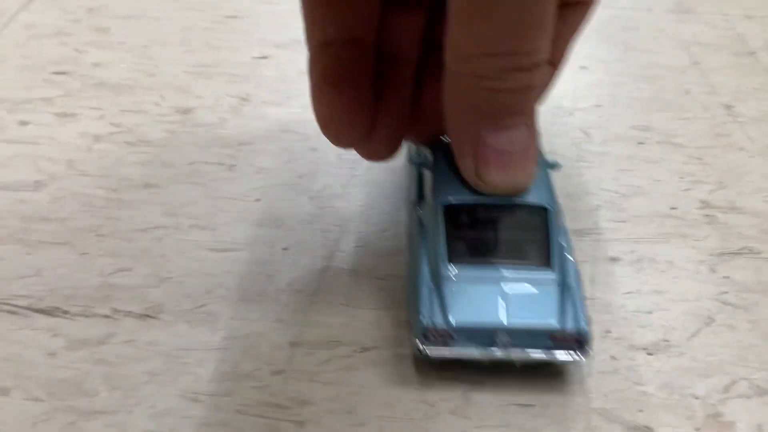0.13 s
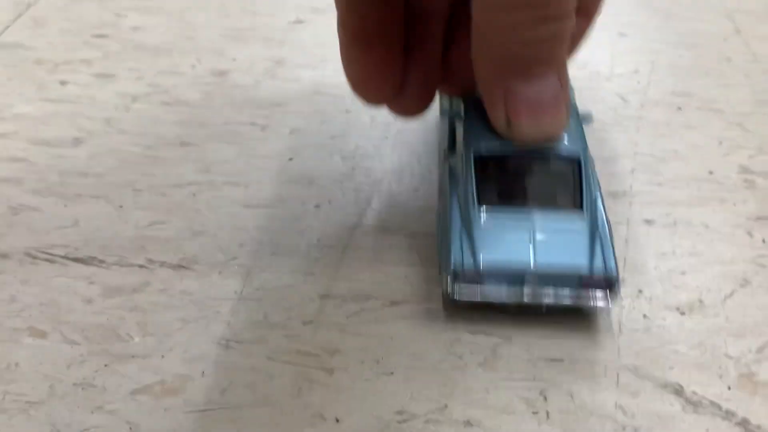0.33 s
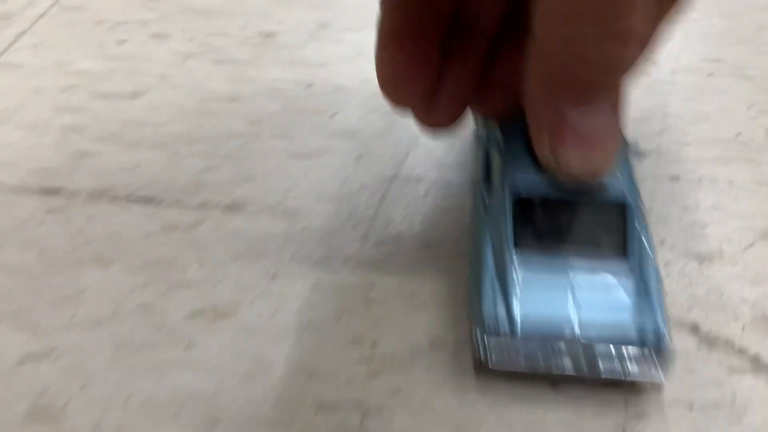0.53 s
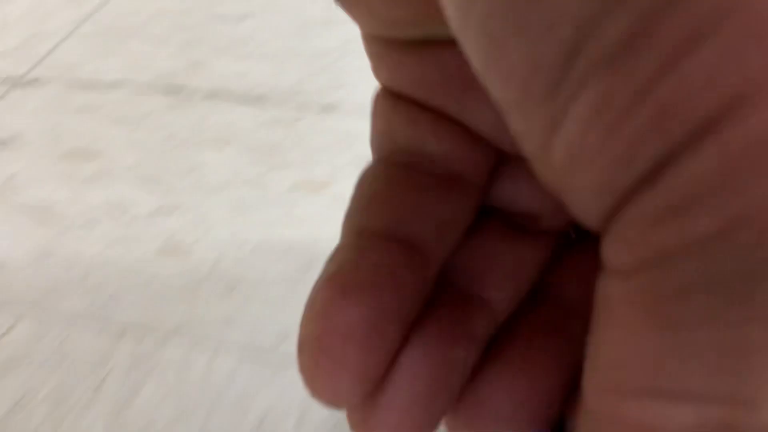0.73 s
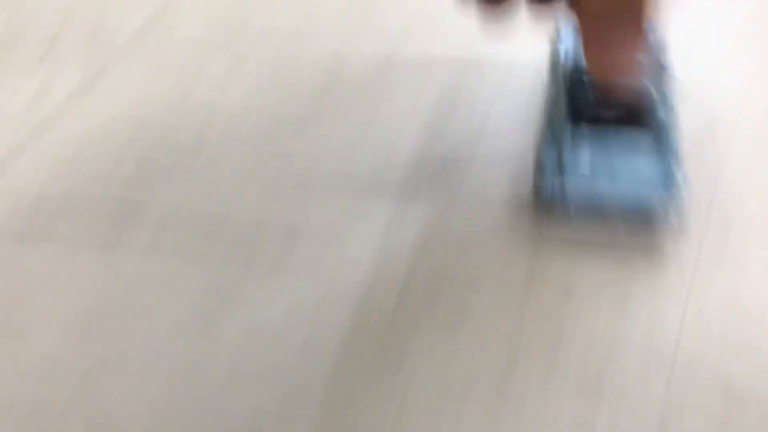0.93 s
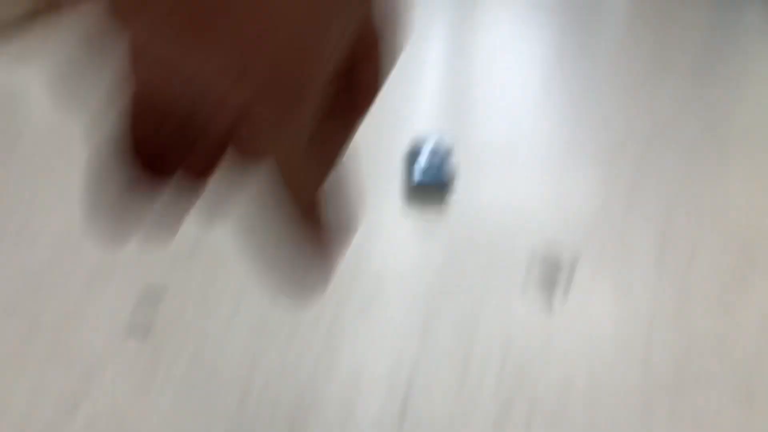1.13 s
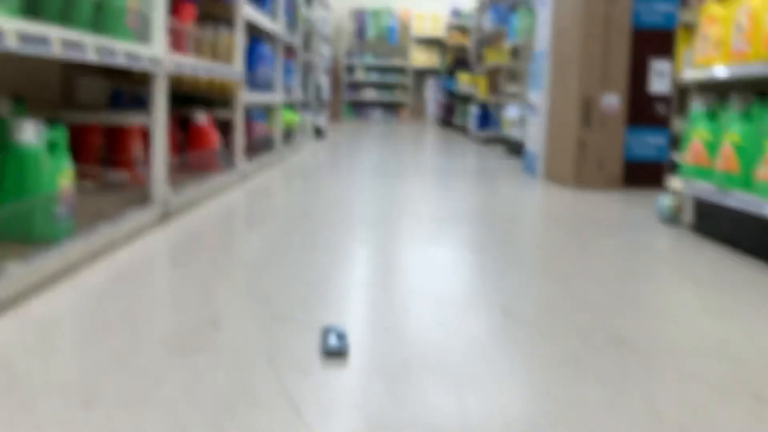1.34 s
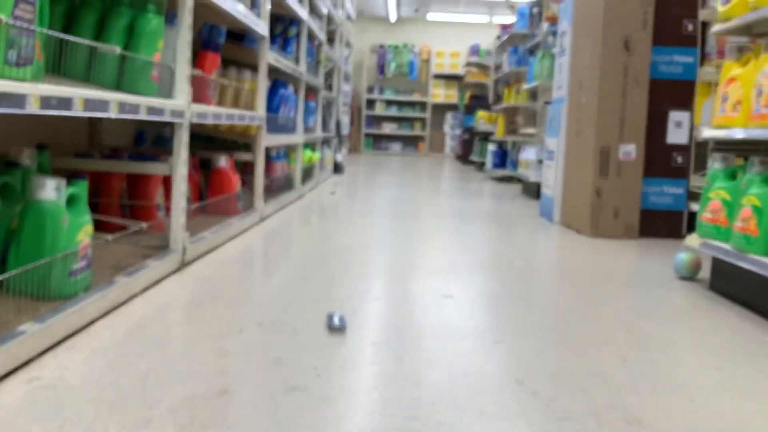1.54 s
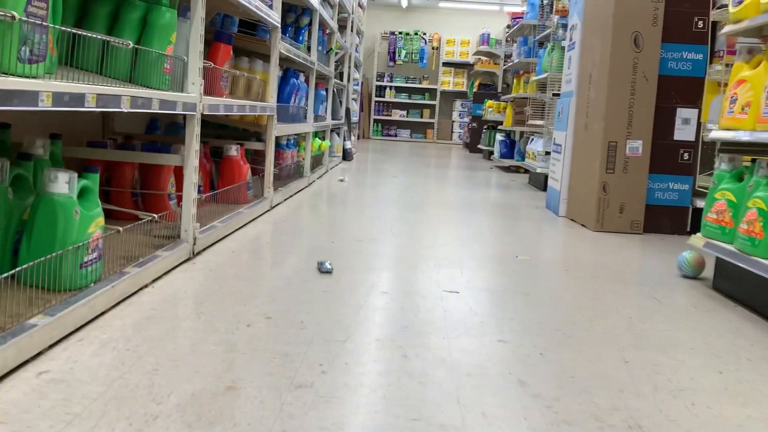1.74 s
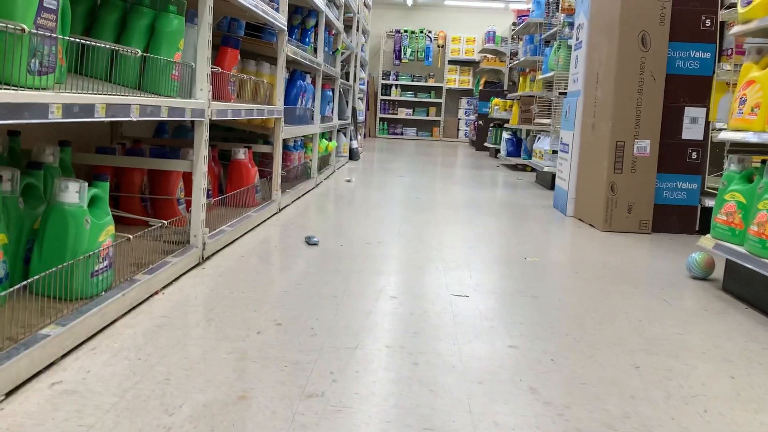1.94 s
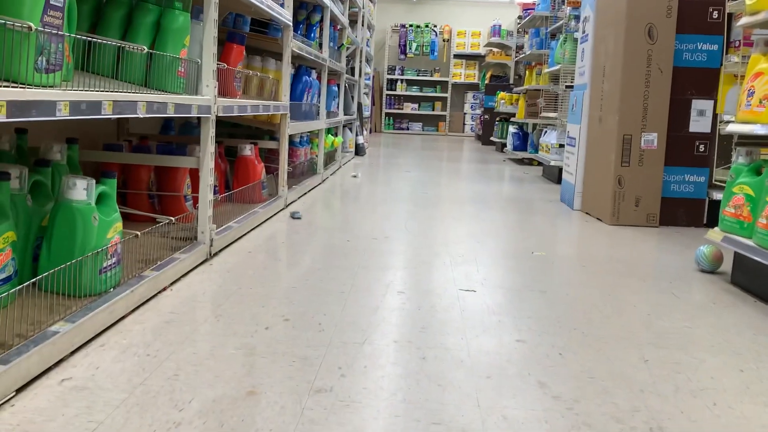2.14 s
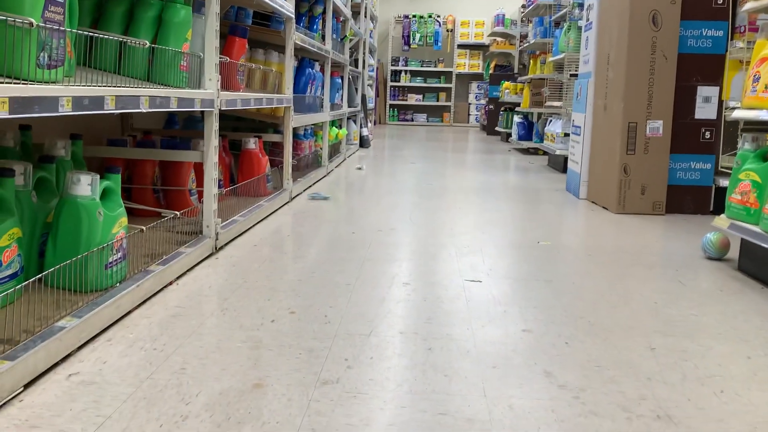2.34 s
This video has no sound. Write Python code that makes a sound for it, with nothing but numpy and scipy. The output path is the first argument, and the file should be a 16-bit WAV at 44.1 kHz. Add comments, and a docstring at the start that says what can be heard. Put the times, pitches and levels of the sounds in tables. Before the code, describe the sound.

A small metal toy car scrapes softly on a hard floor, is shoved off with a clatter and rolls away with a gritty rush until it clacks against a shelf. A low ventilation hum fills the shop aisle.

```python
"""Toy car in a shop aisle

A small die-cast car is rolled back by hand, shoved off and rolls away until it hits a shelf foot.
Hard wheels chatter over the floor's grit and ring the metal body; the crash echoes in the aisle.
Ventilation and mains hum fill the shop. A phone's two microphones hear it with a phase offset."""
import sys
import numpy as np
from scipy import signal
from scipy.fft import rfft, irfft, next_fast_len
from scipy.io import wavfile
from scipy.ndimage import map_coordinates

SR = 44100
rng = np.random.default_rng(int(sys.argv[2]) if len(sys.argv) > 2 else 0)


def log_audio(samples):
    """Write samples as a 16-bit WAV file to the path given in sys.argv[1]."""
    # one column per channel
    frames = np.atleast_2d(samples).T
    # limit to full scale, then quantise
    limited = np.clip(frames, -1, 1)
    pcm = np.round(limited * 32767).astype(np.int16)
    wavfile.write(sys.argv[1], SR, pcm)


N = 105002

# Background spectra (frequency [Hz], relative level [dB])
VENT_SPECTRUM = [(13, -48), (22, -19), (65, 0.5), (91, 0), (125, 2), (148, -8.5), (245, -17), (388, -22),
                 (530, -29.5), (708, -29), (1070, -41.5), (1230, -36), (7000, -58.5), (9100, -98),
                 (15400, -120)]
ROOM_HISS_SPECTRUM = [(2000, -20), (5000, 4), (8000, -12), (15500, -22)]
# Rolling force (time [s], level [dB], hiss re level [dB], rumble re level [dB])
ROLL_LEVELS = [(0, -62.5, -19, -6), (0.2, -60.5, -12, -3), (0.26, -66, -17, -17), (0.3, -61.5, -21, -18),
               (0.35, -54, -15, -14), (0.44, -70.5, -22, -7), (0.529, -42.5, -13, -8),
               (0.598, -37, -8, -11), (0.68, -34.5, -17, -9), (0.744, -37.5, -22, -8.5),
               (0.786, -60.5, -22, -3), (0.815, -53, -15, -4), (0.869, -31.5, -12, -23),
               (0.899, -23, -9.5, -15), (0.946, -20, -5, -31), (0.963, -31, 2.5, -9.5),
               (1.05, -32, -2.5, -14), (1.2, -33.5, -4.5, -18.5), (1.4, -36, -4, -14.5),
               (1.64, -40, -7, -26), (1.82, -37, -5, -9), (1.9, -38.5, -7.5, -31), (2.15, -42, -5, -35),
               (2.23, -36.5, -6, -17), (2.33, -41, -10.5, -5), (2.38, -42, -11, -20)]
# Wheel and body knocks; shelf contacts (time [s], body [dB], treble [dB], rumble [dB])
KNOCKS = [(0.085, -60, -75, -46.5), (0.1915, -51, -76, -54), (0.3247, -43, -65, -39),
          (0.5142, -36, -61, -35), (0.5692, -26, -25, -60), (0.8005, -57, -72, -38.5),
          (0.826, -27.5, -49, -43), (0.8382, -21.5, -37, -23.5), (0.8619, -18, -48, -62),
          (0.8999, -10, -33, -41), (0.9274, -7, -28, -39), (0.9444, -7.5, -32, -51),
          (1.2665, -18, -16.5, -52), (2.3599, -44, -27.5, -50)]
SHELF_CONTACTS = [(2.2355, -38, -31, -54), (2.2384, -12, -9, -29.5), (2.2475, -13.5, -9.5, -41),
                  (2.2515, -12.5, -30, -27.5), (2.259, -13, -24, -28.5)]
# Car's force-to-sound paths (frequency [Hz], relative gain [dB])
SCRAPE_PATH = [(500, -30), (1200, -11), (1600, -3), (2000, -1), (2500, -3), (3000, 0), (4300, -1),
               (4900, -10), (7000, -20), (9000, -35)]
HISS_PATH = [(3500, -25), (4800, -1), (7000, -1), (10000, -5), (13000, -9), (14000, -14), (15000, -7),
             (15700, -7)]
SNAP_PATH = [(3500, -42), (5500, 5.5), (7500, 4.5), (12000, -2.5), (14000, -5.5), (15500, -9), (16600, -17)]
RUMBLE_PATH = [(200, -27.5), (450, -8), (750, -7.5), (950, -6.5), (1300, 0), (2000, -3.5)]
# Metal body resonances (frequency [Hz], width [Hz], relative gain [dB])
BODY_MODES = [(930, 120, -16), (1270, 130, -13), (1590, 100, -6), (1850, 95, 0), (2130, 110, 0),
              (2330, 100, -4), (2630, 140, -4), (3030, 140, -2), (3270, 130, -2), (3660, 120, 0),
              (3880, 110, -2), (4200, 110, 0), (5050, 150, -10), (6600, 700, -17)]
# Change per resonance under a fingertip (gain [dB])
HELD_MODE_DB = [10, 3, 3, 5, 3, 4, -6, -4, 0, -4, -2, -3, -2, 0]
# Microphone phase (frequency [Hz], left lead [rad])
MIC_LEAD = [(0, 0), (1400, 2), (2400, 8), (3200, 8), (5000, 8.5), (6300, 12), (15700, 0.5), (22050, -18)]
# Microphone likeness (frequency [Hz], coherence [0-1])
MIC_COHERENCE = [(60, 0.99), (200, 0.97), (500, 0.69), (1200, 0.087), (4000, 0.11), (6500, 0.54), (8000, 1),
                 (16000, 1)]
# Microphone balance (frequency [Hz], left minus right [dB])
MIC_BALANCE = [(60, -4), (130, -1.5), (290, -3), (640, 0.5), (1410, 2), (3100, -1.5), (6820, -2),
               (15000, 2)]

KNOCK_T60_S, CRASH_T60_S = (.012, .008, .014), (.043, .014, .043)  # body, treble, rumble
LET_GO_S, RELEASE_S = 0.98, 0.03
HELD_STEADYING, HELD_SCRAPE_DB = 0.4, -4
DRIFT_DB, DRIFT_PER_S = 4, 22
WANDER_HZ, WANDER_PER_S = 70, 14


def amp(db):
    return 10 ** (np.asarray(db) / 20)


def unit_rms(x):
    return x / np.sqrt(np.mean(x ** 2) + 1e-20)


def log_interp(points, hz):
    knots_hz, values = np.transpose(points)
    return np.interp(np.log(hz + 1), np.log(knots_hz + 1), values)


def wobble(knots_per_s, count=N):
    """Smooth random curve."""
    knots = rng.standard_normal(int(count * knots_per_s / SR) + 4)
    return map_coordinates(knots, [np.arange(count) * knots_per_s / SR])


def filtered(x, response):
    size = 2 * next_fast_len(N // 2 + SR // 4)
    return irfft(rfft(x, size) * response(np.fft.rfftfreq(size, 1 / SR)), size)[..., :N]


def colour(points):
    """Minimum-phase response through the points, closed outside them."""
    closed = [(1, -129), *points, (points[-1][0] + 300, -120)]

    def response(hz):
        cepstrum = irfft(np.log(amp(log_interp(closed, hz))))
        half = len(cepstrum) // 2
        cepstrum[1:half] *= 2
        cepstrum[half + 1:] = 0
        return np.exp(rfft(cepstrum))
    return response


def shop(vent_db=-36.5, hiss_db=-70.5, hum_db=-39, hum_hz=119.5, waver_db=2.5):
    """Ventilation rumble, faint hiss and wavering mains hum."""
    vent = unit_rms(filtered(rng.standard_normal(N), colour(VENT_SPECTRUM)))
    hiss = unit_rms(filtered(rng.standard_normal(N), colour(ROOM_HISS_SPECTRUM)))
    hum = np.sqrt(2) * np.sin(2 * np.pi * hum_hz * np.arange(N) / SR + 1.19 * wobble(5.65))
    return amp(vent_db) * vent + amp(hiss_db) * hiss + amp(hum_db + waver_db * wobble(4.2)) * hum


def grit(bumps_per_s=1400, spread_db=2, bump_share=0.46):
    """Random floor bumps over fine roughness."""
    struck = rng.random(N) < bumps_per_s / SR
    bumps = struck * amp(spread_db * rng.standard_normal(N)) * rng.standard_normal(N)
    return np.sqrt(bump_share) * unit_rms(bumps) + np.sqrt(1 - bump_share) * rng.standard_normal(N)


def rolling(flutter_db=1.3, flutter_per_s=70):
    """Fluttering force of wheels on grit: body, treble, rumble."""
    times_s, *columns = np.transpose(ROLL_LEVELS)
    level_db, hiss_db, rumble_db = [np.interp(np.arange(N) / SR, times_s, c) for c in columns]
    level_db += flutter_db * wobble(flutter_per_s)
    return np.array([grit() * amp(level_db + offset_db) for offset_db in (0, hiss_db, rumble_db)])


def jolts(contacts, t60_s, rise_s=.0003):
    """One dying burst of noisy force per contact: body, treble, rumble."""
    force = np.zeros((3, N + SR))
    t = np.arange(SR // 4) / SR
    envelope = amp(-60 * t / np.array(t60_s)[:, None]) * (1 - np.exp(-t / rise_s))
    for time_s, *levels_db in contacts:
        start = round(time_s * SR)
        signs = np.sign(rng.standard_normal(len(t)))
        force[:, start:start + len(t)] += amp(levels_db)[:, None] * envelope * signs
    return force[:, :N]


def crash(aisle_db=(-7, -2, 1), aisle_t60_s=0.18):
    """Quick shelf contacts plus the aisle's reverberation: body, treble, rumble."""
    hit = jolts(SHELF_CONTACTS, CRASH_T60_S)
    t = np.arange(SR // 2) / SR
    tail = rng.standard_normal(len(t)) * amp(-60 * t / aisle_t60_s)
    reverb = signal.fftconvolve(hit, tail[None] / np.linalg.norm(tail), axes=1)[:, :N]
    return hit + amp(aisle_db)[:, None] * reverb


def car_paths(hz, ring_db=8):
    """Hiss, snap and rumble at unit power each; scrape and body modes share unit power."""
    hiss, snap, rumble, scrape = [colour(p)(hz) for p in (HISS_PATH, SNAP_PATH, RUMBLE_PATH, SCRAPE_PATH)]
    body = [scrape]
    for mode_hz, width_hz, gain_db in BODY_MODES:
        loss = 1j * hz * width_hz
        body.append(amp(gain_db + ring_db) * (loss / (mode_hz ** 2 - hz ** 2 + loss)) ** 2)
    paths = []
    for group in ([hiss], [snap], [rumble], body):
        power = sum(np.mean(np.abs(path) ** 2) for path in group)
        paths += [path / np.sqrt(power) for path in group]
    return np.array(paths)


def rocking(knots_per_s, held, hop=16):
    """The car's rocking, one curve per mode; smaller while held."""
    coarse = [wobble(hop * knots_per_s, N // hop + 1) for _ in BODY_MODES]
    return (1 - HELD_STEADYING * held) * np.repeat(coarse, hop, axis=1)[:, :N]


def body_ring(modes, held):
    """Rocking shifts each mode's strength and pitch; the fingertip rebalances the modes."""
    drift = unit_rms(amp(DRIFT_DB * rocking(DRIFT_PER_S, held)))
    wander_cycles = np.cumsum(WANDER_HZ * rocking(WANDER_PER_S, held), axis=1) / SR
    analytic = signal.hilbert(modes, next_fast_len(N))[:, :N]
    rings = np.real(analytic * np.exp(2j * np.pi * wander_cycles))
    return (rings * drift * amp(np.outer(HELD_MODE_DB, held))).sum(axis=0)


def car():
    """Rolling and impacts drive the car's paths; a fingertip rests on the roof until let-go."""
    roll_body, roll_treble, roll_rumble = rolling()
    hit_body, hit_treble, hit_rumble = jolts(KNOCKS, KNOCK_T60_S) + crash()
    body_forces = [roll_body + hit_body] * (1 + len(BODY_MODES))
    forces = np.array([roll_treble, hit_treble, roll_rumble + hit_rumble] + body_forces)
    forces *= np.sign(rng.standard_normal(forces.shape))  # decorrelates the paths
    hiss, snap, rumble, scrape, *modes = filtered(forces, car_paths)
    held = np.clip((LET_GO_S - np.arange(N) / SR) / RELEASE_S, 0, 1)
    return hiss + snap + rumble + amp(HELD_SCRAPE_DB * held) * scrape + body_ring(modes, held)


def microphones(shared, scattered):
    """Shared sound in like sign, scattered in opposite sign; both offset in phase and level."""
    side = np.array([[1], [-1]])

    def mix_rad(hz):
        return np.arccos(log_interp(MIC_COHERENCE, hz)) / 2

    def port(hz):
        lead_rad = np.interp(hz, *np.transpose(MIC_LEAD))
        return amp(side * log_interp(MIC_BALANCE, hz) / 2) * np.exp(.5j * side * lead_rad)

    return (filtered(shared, lambda hz: port(hz) * np.cos(mix_rad(hz)))
            + filtered(scattered, lambda hz: port(hz) * side * np.sin(mix_rad(hz))))


def scene():
    """Two independent draws of car and shop, mixed to stereo."""
    return microphones(shared=car() + shop(), scattered=car() + shop())


def record(dry, top_hz=17100):
    """Brick-wall low-pass."""
    return filtered(dry, lambda hz: hz < top_hz)


dry = scene()
out = record(dry)
log_audio(out)
```